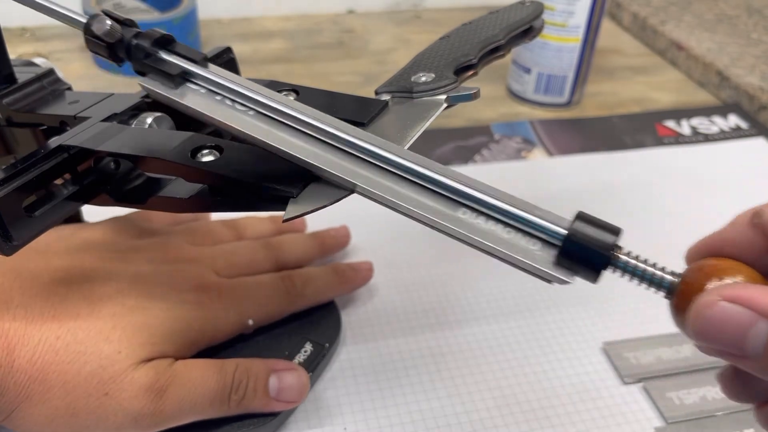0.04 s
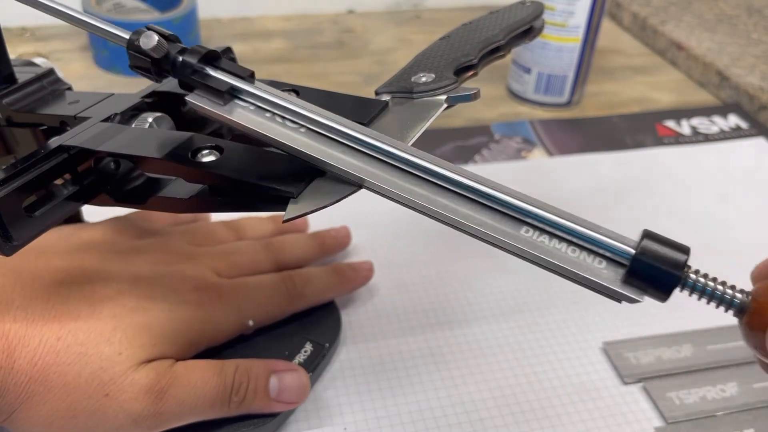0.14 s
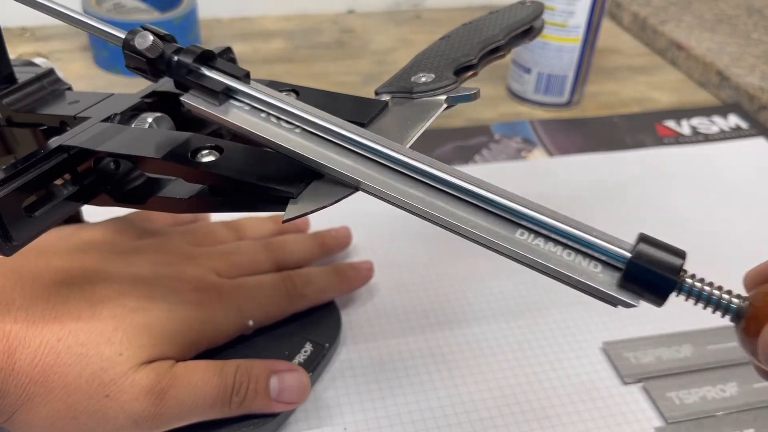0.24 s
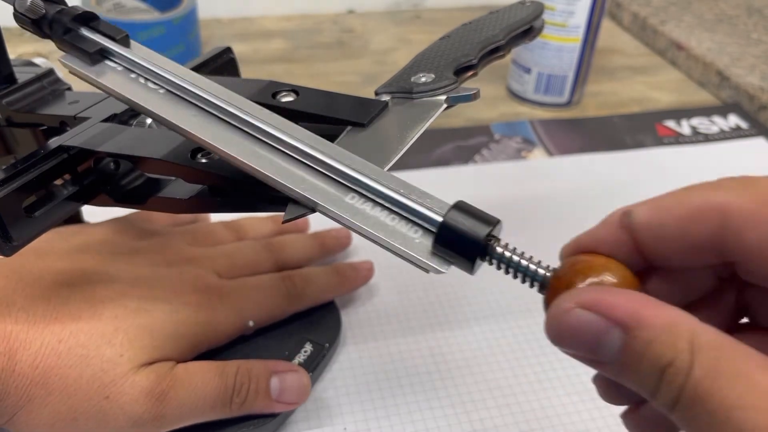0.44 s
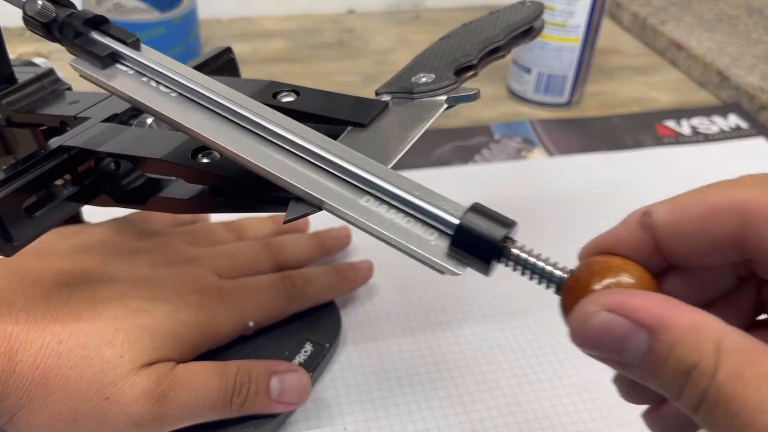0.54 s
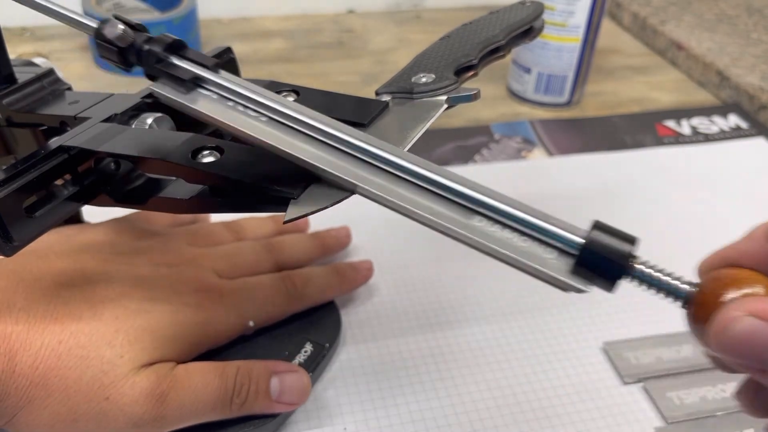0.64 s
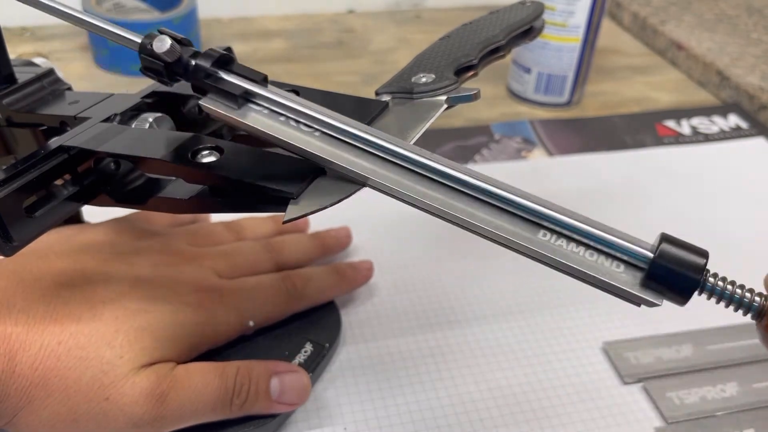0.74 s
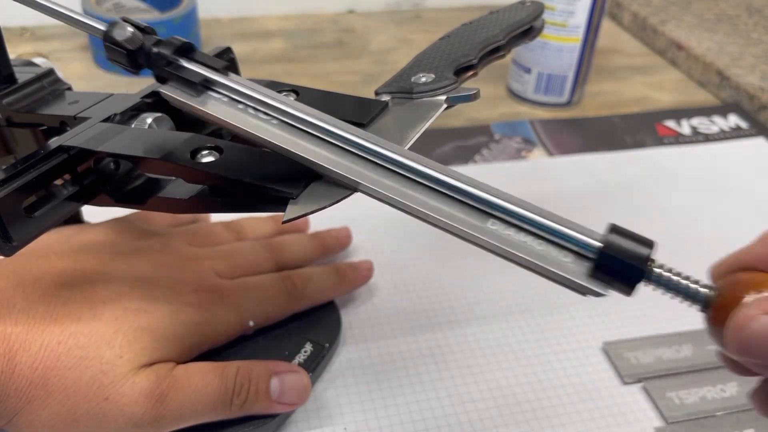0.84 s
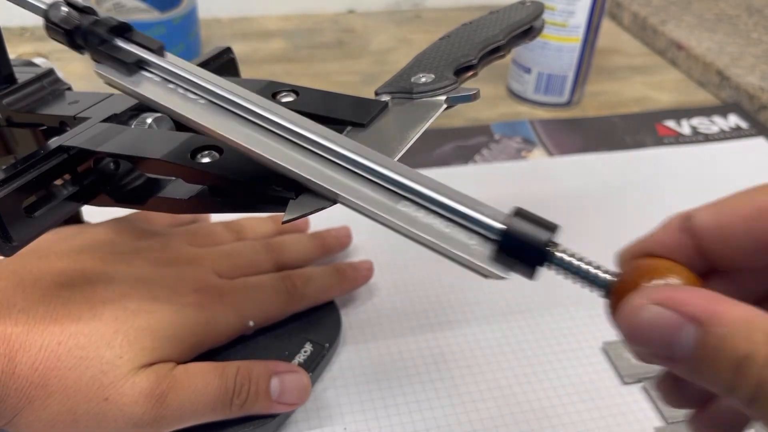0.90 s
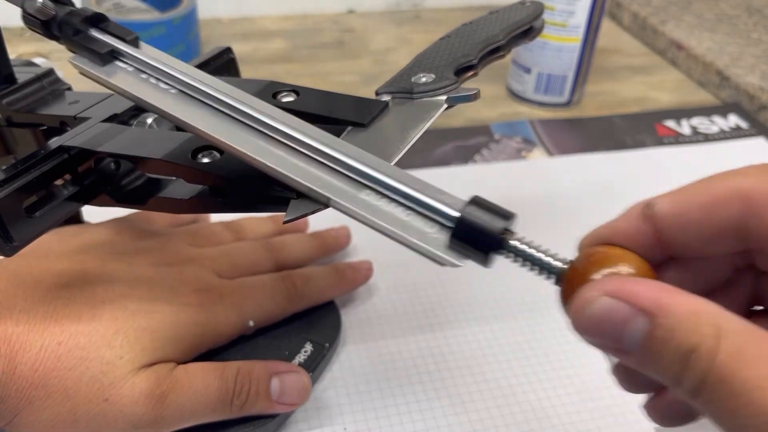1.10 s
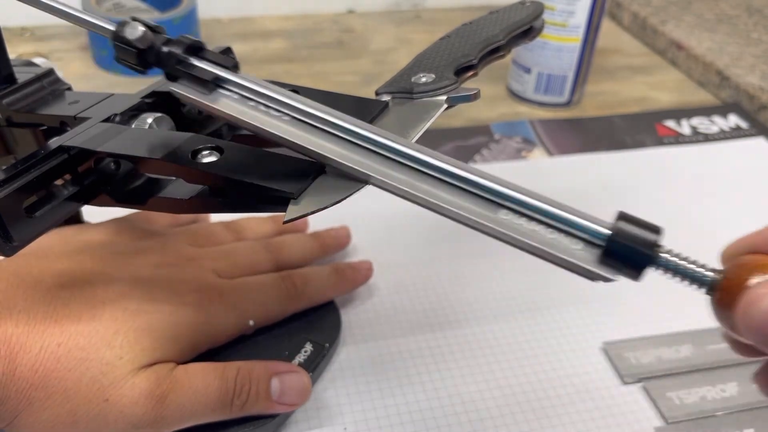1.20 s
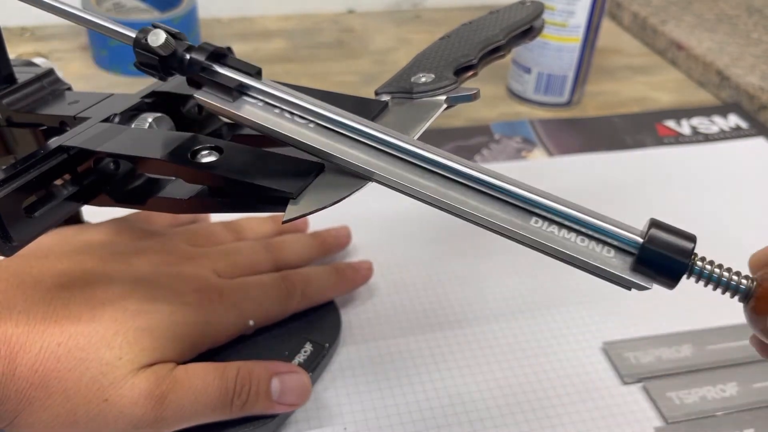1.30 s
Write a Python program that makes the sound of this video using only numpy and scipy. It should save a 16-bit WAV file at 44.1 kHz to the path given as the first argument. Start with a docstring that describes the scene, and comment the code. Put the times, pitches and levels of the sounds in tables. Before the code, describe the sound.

A diamond stone rasps back and forth on a steel knife edge, each stroke about a quarter second, fading nearly silent at the turns near 0.15, 0.45, 0.7, 1.0 and 1.25 seconds. The scrape is hissy, gritty and faintly ringing, stronger later. From 0.24 to 0.7 seconds a much louder low, lumpy air rumble buffets the close microphone. A sharp bite comes near 0.9; faint low noise lies beneath.

```python
"""Diamond stone on a steel knife edge

A diamond stone on a guide rod is pushed and pulled along a clamped steel edge, about four strokes a second.
Random grain impacts drive steel resonances; the level follows a power of hand speed and dies at each turn.
For half a second a low, lumpy rumble, like moving air, buffets the close microphone: shaped noise and bumps.
A faint low-weighted noise lies beneath; frequency-dependent phase and level set the two ports apart."""
import sys
import numpy as np
from scipy import signal
from scipy.fft import rfft, irfft, next_fast_len
from scipy.io import wavfile
from scipy.ndimage import uniform_filter1d, minimum_filter1d

SR = 44100
rng = np.random.default_rng(int(sys.argv[2]) if len(sys.argv) > 2 else 0)


def inscribe(sig):
    """Save sig as 16-bit PCM at rate SR to the path in sys.argv[1].

    A 1-D sig is mono; a 2-D sig holds one channel per row.
    Samples are clipped to [-1, 1] before scaling.
    """
    pcm = np.round(np.clip(np.atleast_2d(sig).T, -1, 1) * 32767)
    wavfile.write(sys.argv[1], SR, pcm.astype(np.int16))


N = 59535
T = np.arange(N) / SR
SIZE = next_fast_len(N + 8192)  # zero padding leaves room for filter tails
HZ = np.fft.rfftfreq(SIZE, 1 / SR)
EDGE_HZ = 15800  # upper band limit

# resonances of blade, stone and rod:
# (f/Hz, full width at half the lift/Hz, lift on the push/dB, lift on the pull/dB)
STEEL_RESONANCES = [(1618, 130, 15, 4), (2340, 57, 4.5, -4), (2830, 49, 1, -2), (3668, 113, 7, 8.5),
                    (4085, 254, 9, 9.5), (5440, 320, 2, 4.5), (5930, 51, 6, 10.5), (7580, 340, 3, 2.5),
                    (8035, 94, 3, 14), (9330, 250, -0.5, 7.5), (10500, 240, 1.5, -7), (11250, 164, 0, 7.5)]


def amp(db):
    """Level: converts decibels to an amplitude ratio."""
    return 10 ** (np.asarray(db) / 20)


def unit(x):
    """Normalization: scales a signal to rms 1."""
    return x / np.sqrt(np.mean(x ** 2) + 1e-20)


def read(points):
    """Interpolation: joins a table's values linearly over a logarithmic frequency axis."""
    hz, value = np.transpose(points)
    return np.interp(np.log(HZ + 1), np.log(hz), value)


def shape(x, gain):
    """Linear filtering: multiplies the spectrum by a gain per frequency."""
    spectrum = rfft(x, SIZE)
    return irfft(spectrum * gain, SIZE)[..., :N]


def noise(points):
    """Spectral shaping: gives white noise the tabulated spectrum, at rms 1."""
    return unit(shape(rng.standard_normal(N), amp(read(points))))


def wander(top_hz):
    """Random modulation: band-limits noise to roughly 10 Hz up to top_hz, at rms 1."""
    low_cut = HZ / (HZ + 10)
    high_cut = 1 / (1 + (HZ / top_hz) ** 2)
    return unit(shape(rng.standard_normal(N), low_cut * high_cut))


def tail(t60):
    """Exponential decay: frequency response of a dense dying ring of energy 1, falling 60 dB in t60 s."""
    ring = rng.standard_normal(N) * amp(-60 * T / t60) * (T > .001)
    return rfft(ring / np.linalg.norm(ring), SIZE)


def grit():
    """Shot noise: diamond grains of uneven size tick across the edge at random instants."""
    grains_per_s, spread_db = 16000, 1.5
    hits = rng.random(N) < grains_per_s / SR
    size = amp(spread_db * np.clip(rng.standard_normal(N), -2, 2))
    return unit(hits * rng.standard_normal(N) * size)


def speed(start, end, fastest, rise):
    """Reciprocating motion: the hand speeds up from one turn and slows into the next, on a skewed half sine."""
    peak_time = start + np.clip(fastest, .1, .9) * (end - start)
    u = np.interp(T, [start, peak_time, end], [0, .5, 1])
    curve = np.where(u < .5, max(rise, .1), 1)
    moving = (T >= start) & (T < end)
    return abs(np.sin(np.pi * u)) ** curve * moving


def rasp(strokes, lifts_db):
    """Friction noise: grain impacts excite the steel's resonances, louder with a power of sliding speed."""
    # fine hiss of the grit: (f/Hz, relative spectral level/dB)
    hiss_colour = [(1000, -41), (4500, -27.5), (6800, -7), (8000, -1.5), (9900, 3), (11200, 5), (11900, -9),
                   (12700, -9.5), (13200, -52), (15500, -49)]
    # coarse scrape: (f/Hz, relative spectral level/dB)
    scrape_colour = [(200, -2), (700, -8.5), (1150, -13), (2000, -5), (2650, 3), (3000, -10.5), (3300, 1.5),
                     (4050, -5.5), (4700, -5), (6500, 4), (9000, 1.5), (12500, 0.5), (13300, -23.5)]
    hiss_power, scrape_power = 1.8, 0.72  # exponents of amplitude against relative speed
    turn_db = -54  # faint constant mean of hiss and scrape, which goes on while the hand turns
    steel_db = sum(lift / (1 + (2 * (HZ - row[0]) / row[1]) ** 2)
                   for row, lift in zip(STEEL_RESONANCES, lifts_db))
    hiss = unit(shape(grit(), amp(read(hiss_colour) + steel_db)))
    scrape = unit(shape(grit(), amp(read(scrape_colour) + steel_db)))
    out = amp(turn_db) * (hiss + scrape) / 2
    for start, end, hiss_db, scrape_db, fastest, rise in strokes:
        v = speed(start, end, fastest, rise)
        out += amp(hiss_db) * v ** hiss_power * hiss
        out += amp(scrape_db) * v ** scrape_power * scrape
    return out


def stone():
    """Modulated friction and resonance: both stroke directions chatter, bite and leave the steel ringing."""
    # strokes away from the hand: (start t/s, end t/s, hiss level/dB, scrape level/dB,
    # share of the stroke at which it is fastest, held to .1-.9, exponent of the rise: low = grabs at once)
    pushes = [(.175, .438, -30.5, -39, 0.76, 0.46), (.725, .985, -28.5, -35.5, 0.7, 0.65),
              (1.255, 1.5, -25, -33.5, 0.98, 0.73)]
    # strokes back toward the hand, same columns
    pulls = [(-.125, .147, -35.5, -32, 0.21, .6), (.455, .695, -30, -37, 0.45, 0.22),
             (.99, 1.232, -26, -33.5, 0.21, 0.89)]
    # the grit bites harder: (centre t/s, 1/e half-length/s, gain/dB)
    bites = [(0.385, 0.014, 2), (0.912, 0.0052, 10), (0.933, 0.013, 4.5), (1.054, 0.0065, 1)]
    chatter_db, chatter_hz = 1.12, 150  # rms unevenness and its upper rate
    ring_t60_s, ring_db = 0.11, -6  # ring level is relative to the direct rasp
    both = rasp(pushes, [row[2] for row in STEEL_RESONANCES])
    both += rasp(pulls, [row[3] for row in STEEL_RESONANCES])
    bite_db = sum(db * np.exp(-((T - s) / length) ** 2) for s, length, db in bites)
    both = both * amp(bite_db + chatter_db * wander(chatter_hz))
    ringing = 1 + amp(ring_db) * tail(ring_t60_s)
    return shape(both, ringing / np.hypot(1, amp(ring_db)))


def drift(x):
    """Band-wise modulation: as the contact slides, neighbouring bands swell and fade independently."""
    swell_db, swell_hz, band_hz = 2.24, 11.4, 436.7  # rms swell, upper rate, band spacing
    out = np.zeros(N)
    for hz in np.arange(0, EDGE_HZ, band_hz):
        triangle = np.maximum(1 - abs(HZ - hz) / band_hz, 0)
        out += shape(x, triangle) * amp(swell_db * wander(swell_hz))
    return out


def singing():
    """Selective excitation: as the contact slides, the grit briefly drives one band of the steel harder."""
    # (centre t/s, 1/e half-length/s, f/Hz, width at half amplitude/Hz, level/dB)
    bursts = [(0.061, 0.084, 977, 165, -54), (-0, 0.029, 3720, 1100, -46), (0.223, 0.044, 3950, 320, -46.5),
              (0.387, .025, 2230, 1270, -41.5), (0.635, 0.023, 2460, 219, -41.5),
              (.61, .04, 5990, 260, -38.5), (0.81, 0.013, 6130, 300, -34.5), (0.94, 0.024, 1810, 1150, -40),
              (1.036, 0.026, 2770, 450, -43.5), (1.164, 0.045, 6150, 300, -40),
              (1.185, 0.017, 3460, 520, -44.5)]
    out = np.zeros(N)
    for s, length, hz, width, db in bursts:
        band = unit(shape(grit(), 1 / (1 + (2 * (HZ - hz) / width) ** 4)))
        out += amp(db) * np.exp(-((T - s) / length) ** 2) * band
    return out


def along_stone():
    """Diffuse radiation: the long stone and its echo off the bench reach the two ports incoherently."""
    # sound from along the stone and rod: (f/Hz, level against the contact point/dB)
    spread = [(300, -9), (1200, -4.5), (2500, -4.5), (4500, -3), (7000, -6), (8000, -12), (12000, -13)]
    echo_t60_s = 0.057
    return np.array([shape(stone(), amp(read(spread)) * tail(echo_t60_s)) for _ in range(2)])


def buffet():
    """Pressure fluctuation: amplitude-modulated low noise makes a deep lumpy rumble with a fluttering top."""
    # strength of the buffeting: (t/s, level/dB)
    strength = [(0, -50.5), (.21, -50), (.243, -14), (.3, -17.5), (.337, -17.5), (.42, -13), (.49, -7.5),
                (.53, -13), (.645, -14.5), (.692, -27.5), (.75, -33.5), (.81, -40.5), (.87, -35),
                (.955, -33), (1.03, -45), (1.35, -63)]
    # deep body: (f/Hz, relative spectral level/dB)
    deep_colour = [(20, -42), (42, -11.5), (70, 3), (115, 3.5), (200, -4.5), (350, -8.5), (600, -26),
                   (1200, -73)]
    # fluttering top: (f/Hz, relative spectral level/dB)
    flutter_colour = [(60, -15), (200, -0.5), (320, -2), (550, -4), (800, -15), (1100, -26.5), (1600, -42),
                      (3000, -74)]
    flutter_db, lump_hz = -5, 85  # level against the deep body, upper rate of both lumps
    deep_lump_db, flutter_lump_db = 1, 6  # rms, and greatest swing either way
    deep = unit(noise(deep_colour) * amp(deep_lump_db * wander(lump_hz)))
    flutter_lumps = amp(flutter_lump_db * np.tanh(wander(lump_hz)))
    flutter = unit(noise(flutter_colour) * flutter_lumps)
    envelope = amp(np.interp(T, *np.transpose(strength)))
    return envelope * (deep + amp(flutter_db) * flutter)


def bumps():
    """Pressure transient: each low bump is one short swing, the second derivative of a Gaussian, inverted."""
    # (centre t/s, peak level/dB, centre f/Hz)
    swings = [(.237, -14, 398), (0.266, -22, 494), (0.297, -4.5, 135), (0.373, -6.5, 500), (0.423, 0, 247),
              (.458, 1, 454), (.482, -1, 516), (0.5, -1.5, 377), (0.5206, 1, 624), (.565, -7.5, 610),
              (.605, -14, 640), (.656, -19.5, 470), (.674, -12, 487), (.697, -25, 670), (.707, -15, 517),
              (.727, -30, 610), (.742, -32, 480), (0.752, -16.5, 134.3), (.784, -27, 620), (.98, -26, 500),
              (0.994, -21.5, 157), (1.103, -32, 470), (1.16, -31, 242)]
    out = np.zeros(N)
    for s, db, hz in swings:
        u = (np.pi * hz * (T - s)) ** 2
        out += amp(db) * (1 - 2 * u) * np.exp(-u)
    return out


def background():
    """Stationary noise: a steady, low-weighted floor."""
    # (f/Hz, relative spectral level/dB)
    floor_colour = [(20, -42), (45, -7), (70, -3.5), (130, -17), (300, -33), (1000, -36.5), (3000, -55),
                    (12000, -57), (13500, -64)]
    return amp(-46) * noise(floor_colour)


def scene():
    """Superposition and interchannel difference: near sound is coherent at two close ports, wide sound is not."""
    # phase between the microphone ports: (f/Hz, phase by which left leads/rad)
    port_phase = [(20, .85), (300, .85), (700, 1.3), (1000, 2.0), (1400, .2), (2400, -.65), (4800, -.45),
                  (7200, -1.45), (8600, .1), (9300, 1.7), (10280, 3.14), (11900, 6), (13000, 7.9)]
    # level between the ports: (f/Hz, left minus right level/dB)
    port_balance = [(40, -3.5), (150, -0.2), (550, -0.4), (1000, -4), (1600, -2.9), (2800, -2), (5000, -4),
                    (7000, -3), (8500, -0.8), (12000, .1)]
    side = np.array([[.5], [-.5]])  # half of each difference goes to either port
    near = drift(stone()) + singing() + buffet() + bumps() + background()
    direct = shape(near, np.exp(1j * side * read(port_phase)))
    return shape(direct + along_stone(), amp(side * read(port_balance)))


def record(dry):
    """Peak limiting and low-pass filtering: a smooth shared gain holds the peaks, then the band is limited."""
    ceiling = .9  # of full scale, ahead of the band limit
    gain = ceiling / np.maximum(abs(dry).max(0), ceiling)
    held = dry * uniform_filter1d(minimum_filter1d(gain, size=301), size=301)
    lowpass = signal.firwin(511, EDGE_HZ, window=("kaiser", 9), fs=SR)
    return signal.oaconvolve(held, lowpass[None], "same")


dry = scene()
out = record(dry)
inscribe(out)
```